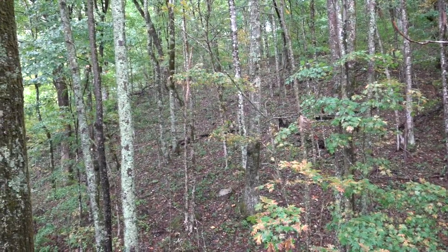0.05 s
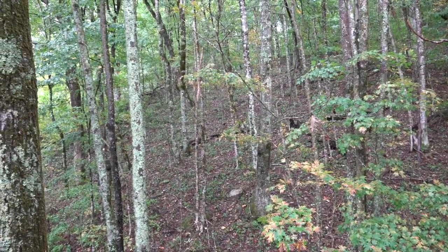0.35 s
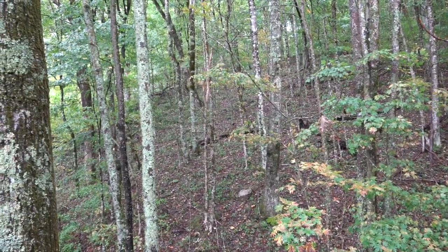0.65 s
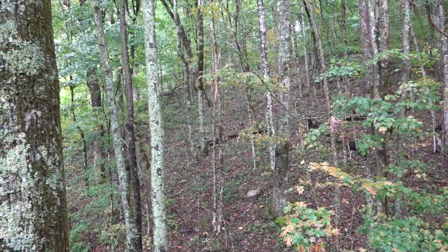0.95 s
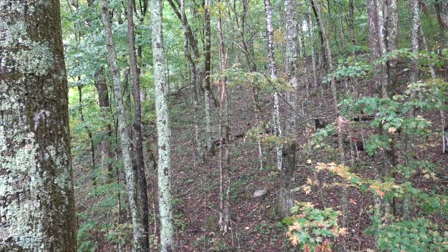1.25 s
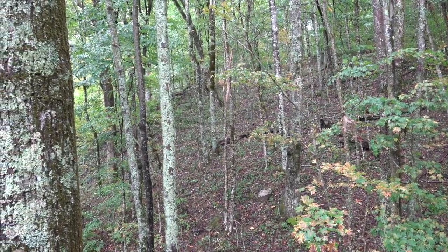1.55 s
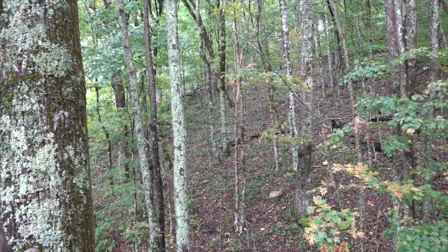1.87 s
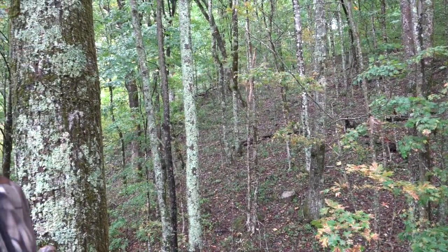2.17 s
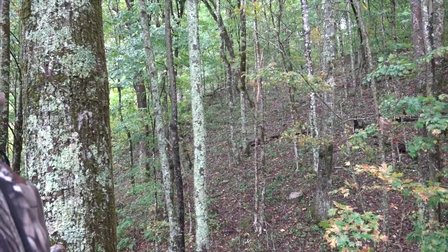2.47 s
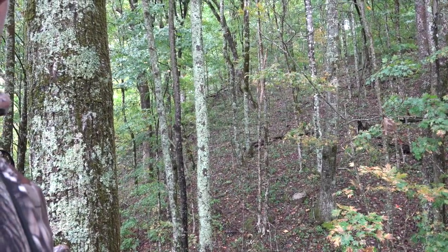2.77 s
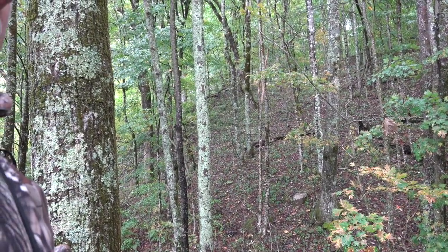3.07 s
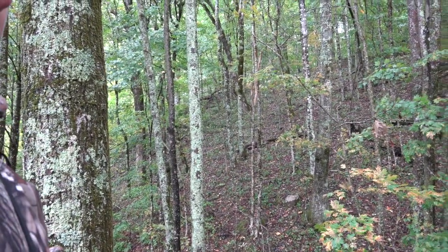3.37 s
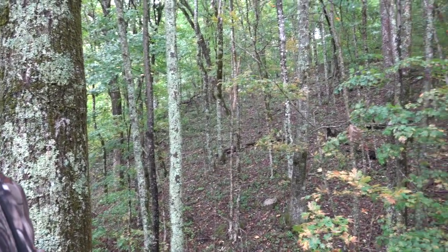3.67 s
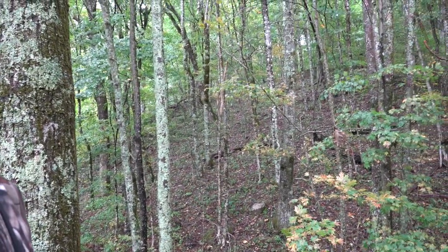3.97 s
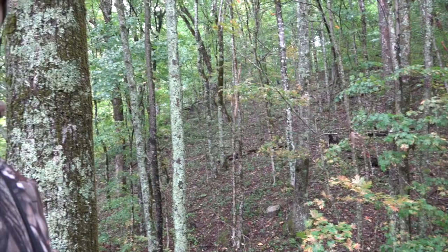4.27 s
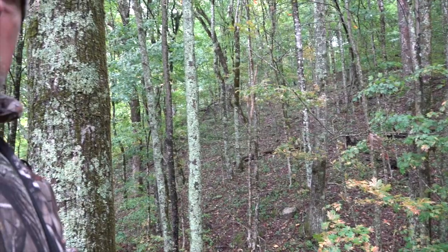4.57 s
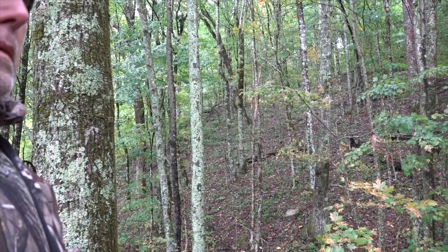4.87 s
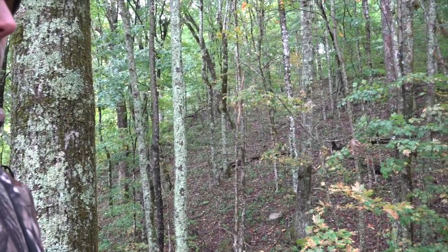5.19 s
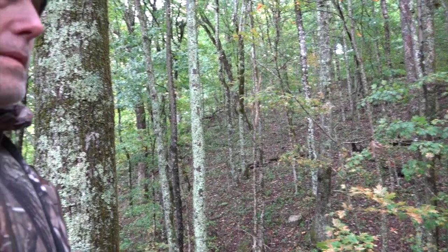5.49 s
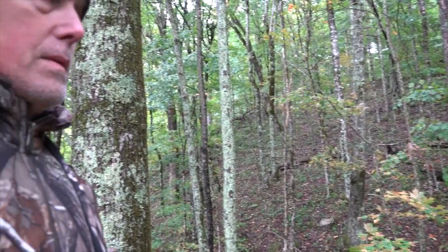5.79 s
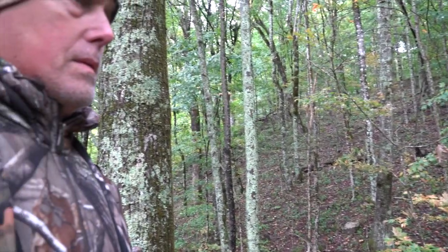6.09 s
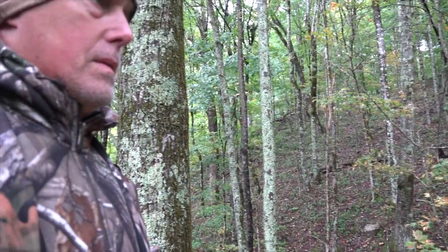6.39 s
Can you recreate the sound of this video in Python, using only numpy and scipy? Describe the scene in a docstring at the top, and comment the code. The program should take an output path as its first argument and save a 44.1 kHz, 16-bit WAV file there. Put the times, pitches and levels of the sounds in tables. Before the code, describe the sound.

A steady hush of distant rain fills a forest, heard through a hand-held microphone. Soft pattering on nearer foliage swells and eases slightly, while light wind buffets the microphone with a low rumble. One close drop ticks on a leaf about a second in, followed by fainter ones. Later comes a small cluster of ticks, one clearly louder than the rest.

```python
"""A leafy wood in light rain, heard through a hand-held microphone.
Countless far drops superpose into a steady wash. Nearer ones strike leaves, which respond as
damped resonators: a patter all around, and a few sharp ticks right beside the listener.
Soft gusts carry turbulence over the microphone, which buffets and rumbles."""
import sys
import numpy as np
from scipy import signal
from scipy.fft import rfft, irfft
from scipy.io import wavfile
from scipy.ndimage import uniform_filter1d

SR = 44100
rng = np.random.default_rng(int(sys.argv[2]) if len(sys.argv) > 2 else 0)


def dump_mix(stems):
    """Bounce the given channels to the path in sys.argv[1] as a 16-bit WAV at rate SR."""
    frames = np.atleast_2d(stems).T  # one column per channel
    limited = np.clip(frames, -1, 1)  # hard clip at full scale
    pcm = np.round(limited * 32767).astype(np.int16)
    wavfile.write(sys.argv[1], SR, pcm)


N = 284044


# Spectrum of distant rain in the canopy: frequency_hz, relative_density_db
WASH_SPECTRUM = [(30, -17), (80, 2.5), (150, 2), (185, -1), (350, -4), (900, -7), (1500, -10.5),
                 (2800, -18), (5100, -20.5), (6200, -24.5), (7500, -28), (9800, -28), (11000, -29.5),
                 (16000, -29)]

def far_rain(level_db, waver_db):
    """Incoherent superposition: countless impacts sum to steady noise, dulled by distance."""
    return from_db(level_db + waver_db * drift(corner_hz=5.6)) * noise(WASH_SPECTRUM)


# How hard the rain falls on the surrounding leaves: time_s, strength_db
RAIN_STRENGTH = [(0.0, -0.5), (0.75, -3.5), (1.3, 4), (2.0, -2), (3.35, 2), (3.75, -0.5), (4.15, 3.5),
                 (4.6, -0.5), (5.15, 2.5), (5.5, 0.8), (6.44, 0)]

def leaf_patter(level_db, drops_per_s, spread_db, low_hz, high_hz, q, leaf_count):
    """Shot noise: impacts at random times excite a bank of leaves, each with its own resonance."""
    time_s, strength_db = np.transpose(RAIN_STRENGTH)
    rain_db = np.interp(np.arange(N) / SR, time_s, strength_db)
    lands = rng.random(N) < drops_per_s * from_db(rain_db) / SR   # harder rain: more drops
    sizes = from_db(rain_db / 2 + spread_db * np.minimum(rng.exponential(1, N), 4))   # and larger ones
    impulses = lands * sizes * rng.choice([-1, 1], N)
    struck_leaf = rng.integers(0, leaf_count, N)
    pitches_hz = np.geomspace(low_hz, high_hz, leaf_count)
    taps = sum(leaf_resonance(impulses * (struck_leaf == k), hz, q) for k, hz in enumerate(pitches_hz))
    return from_db(level_db) * rms_one(taps)


# Drops striking leaves close by: start_s, relative_level_db, pitch_hz, resonance_q
NEAR_IMPACTS = [(0.8856, -7.5, 3660, 1.9), (1.0389, -18, 3110, 2.6), (1.2652, -14.5, 3560, 1.5),
                (1.492, -16, 4840, 1.5), (1.6556, -17, 2990, 1.5), (2.728, -18.5, 1600, 1.5),
                (4.0019, -15, 2000, 0.8), (4.1553, -14.5, 2000, 1.6), (4.1913, -18, 4260, 1.5),
                (4.9587, -10.5, 3950, 1.3), (5.1069, -13, 2340, 1.6), (5.127, -2.5, 2600, 1.2),
                (5.149, -14.5, 2750, 1.5), (5.605, -15, 3650, 1.7), (5.6446, -20, 2320, 1.6),
                (6.389, -9, 2650, 0.87)]

def near_drops(gain_db, blade_hz, blade_q, crack, splash, splash_s, scatter, scatter_s):
    """Impact excitation: a drop pushes a leaf and splashes; trunks and foliage scatter a faint tail."""
    out = np.zeros(N + SR)
    t = np.arange(SR // 10) / SR
    impulse = 1.0 * (t == 0)
    decay = splash * np.exp(-t / splash_s) + scatter * np.exp(-t / scatter_s)
    for start_s, level_db, pitch_hz, q in NEAR_IMPACTS:
        # water is soft: its push holds little far above the pitch of the struck spot
        push = signal.sosfilt(signal.butter(4, 2.5 * pitch_hz, fs=SR, output="sos"), impulse)
        spot = leaf_resonance(push, pitch_hz, q)
        blade = leaf_resonance(push, blade_hz, blade_q)   # the whole blade gives a duller knock
        blade_gain = 0.71 * blade_hz / pitch_hz
        tick = spot / np.abs(spot).max() - blade_gain * blade / np.abs(blade).max()
        hiss = rms_one(leaf_resonance(rng.standard_normal(len(t)), pitch_hz, q=1))
        spray = hiss * decay * (1 - np.exp(-t * pitch_hz / 2))
        start = int(start_s * SR)
        out[start:start + len(t)] += from_db(level_db + gain_db) * (tick + crack * impulse + spray)
    return out[:N]


def leaf_resonance(force, pitch_hz, q):
    """Heavily damped resonance: the ring of a wet leaf swells and dies within a cycle or two."""
    b, a = signal.iirpeak(pitch_hz, q, fs=SR)
    return signal.lfilter(b, a, signal.lfilter(b, a, force + 1e-18))


# Pressure spectra of large and of smaller eddies: frequency_hz, relative_density_db
BUFFETING_SPECTRUM = [(4, -20.5), (7, -0.5), (29, 2), (36, -8.5), (50, -17.5), (80, -29)]
RUMBLE_SPECTRUM = [(25, -16), (42, 6), (58, 3), (75, -4.5), (105, -9.5), (160, -16.5), (300, -39)]
# Gusts passing over the microphone: peak_s, relative_buffeting_db, relative_rumble_db, rise_s
WIND_GUSTS = [(0.15, -19, -27, 0.099), (1.12, -15, -21, 0.068), (1.47, -20, -34, 0.05),
              (3.1, -23.5, -32, 0.41), (3.69, -17, -17.5, 0.11), (4.01, -13, -17.5, 0.022),
              (4.39, -21.5, -22, 0.09), (5.3, -13.5, -18.5, 0.15), (5.73, -16, -29, 0.081),
              (6.17, -18, -25, 0.26)]

def wind(buffeting_gain_db, rumble_gain_db, rumble_lead_s):
    """Turbulent pressure: large eddies buffet the microphone; smaller ones rumble at each gust's front."""
    t = np.arange(N) / SR
    peak_s, buffeting_db, rumble_db, rise_s = np.transpose(WIND_GUSTS)
    buffeting = gust_envelope(t, zip(peak_s, buffeting_db, rise_s), breeze_db=-23)
    buffeting *= eddies(BUFFETING_SPECTRUM, span_s=0.147)
    rumble = gust_envelope(t + rumble_lead_s, zip(peak_s, rumble_db, rise_s), breeze_db=-31)
    rumble *= eddies(RUMBLE_SPECTRUM, span_s=0.079)
    return from_db(buffeting_gain_db) * buffeting + from_db(rumble_gain_db) * rumble


def gust_envelope(t, gusts, breeze_db, fall_ratio=1.53):
    """Addition of powers: bell-shaped gusts, slower to fall than to rise, add to a steady breeze."""
    power = from_db(breeze_db) ** 2
    for peak_s, level_db, rise_s in gusts:
        width_s = np.where(t < peak_s, rise_s, rise_s * fall_ratio)
        power = power + from_db(level_db) ** 2 * np.exp(-((t - peak_s) / width_s) ** 2)
    return np.sqrt(power)


def eddies(spectrum, span_s):
    """Stationary turbulence: noise divided by its running rms keeps an even strength."""
    flow = noise(spectrum)
    power = uniform_filter1d(flow ** 2, int(span_s * SR))
    return flow / np.sqrt(np.abs(power) + 1e-9)


def noise(spectrum):
    """Spectral shaping: white noise weighted by the given spectrum, at an rms of 1."""
    frequency_hz, density_db = np.transpose(spectrum)
    bins_hz = np.maximum(np.fft.rfftfreq(N, 1 / SR), 1)
    gain_db = np.interp(np.log(bins_hz), np.log(frequency_hz), density_db)
    gain = from_db(gain_db) * (bins_hz < frequency_hz[-1])
    return rms_one(irfft(rfft(rng.standard_normal(N)) * gain, N))


def drift(corner_hz):
    """Low-pass filtered noise: a slow wandering about zero, at an rms of 1."""
    bins_hz = np.fft.rfftfreq(N, 1 / SR)
    gain = (bins_hz > 0) / (1 + (bins_hz / corner_hz) ** 2)
    return rms_one(irfft(rfft(rng.standard_normal(N)) * gain, N))


def from_db(db):
    """Decibels to amplitude ratio."""
    return 10 ** (np.asarray(db) / 20)


def rms_one(x):
    """Normalisation to an rms of 1."""
    return x / np.sqrt(np.mean(x ** 2) + 1e-20)


def scene():
    """Linear superposition: rain at three distances and wind add at one microphone."""
    patter = leaf_patter(level_db=-42, drops_per_s=1100, spread_db=2.0,
                         low_hz=2180, high_hz=6000, q=1.84, leaf_count=14)
    ticks = near_drops(gain_db=2.5, blade_hz=1120, blade_q=1.9, crack=0.25,
                       splash=0.1, splash_s=0.0046, scatter=0.018, scatter_s=0.016)
    wash = far_rain(level_db=-23, waver_db=0.04)
    gusts = wind(buffeting_gain_db=1.5, rumble_gain_db=-1.5, rumble_lead_s=0.03)
    return (wash + patter + ticks + gusts)[None]


def record(dry):
    """Clipping and band limiting: peaks stop at full scale, then a steep low-pass cuts the top."""
    cutoff_hz = 15750
    lowpass = signal.ellip(12, 0.1, 90, cutoff_hz, fs=SR, output="sos")
    return signal.sosfilt(lowpass, np.clip(dry, -1, 1))


dry = scene()
out = record(dry)
dump_mix(out)
```